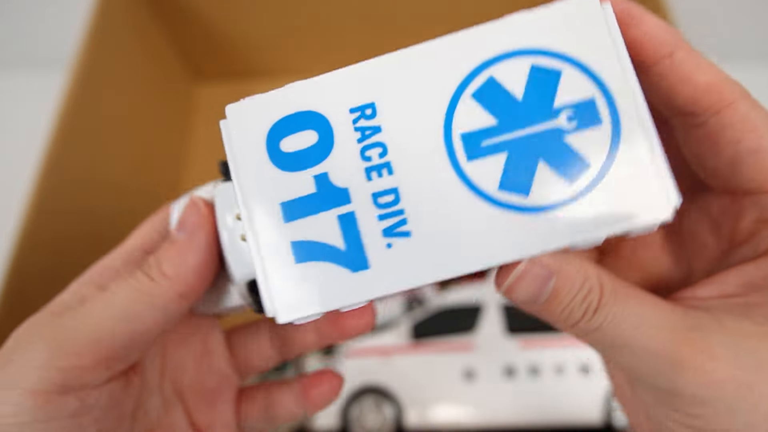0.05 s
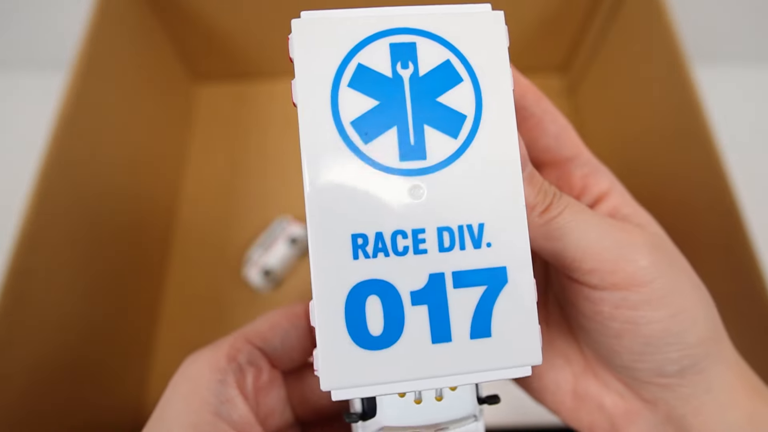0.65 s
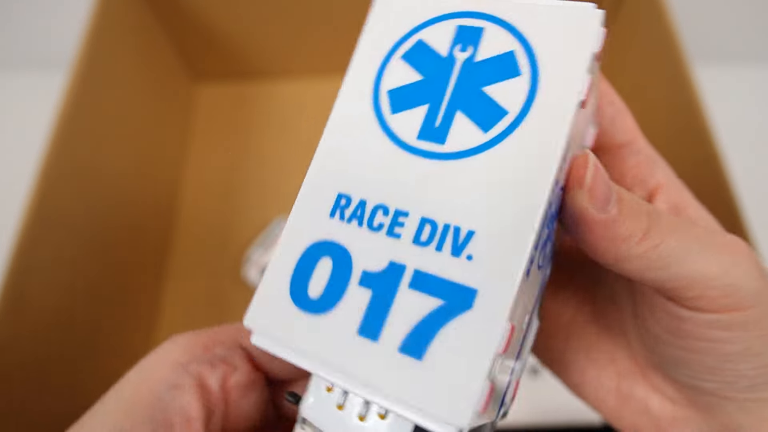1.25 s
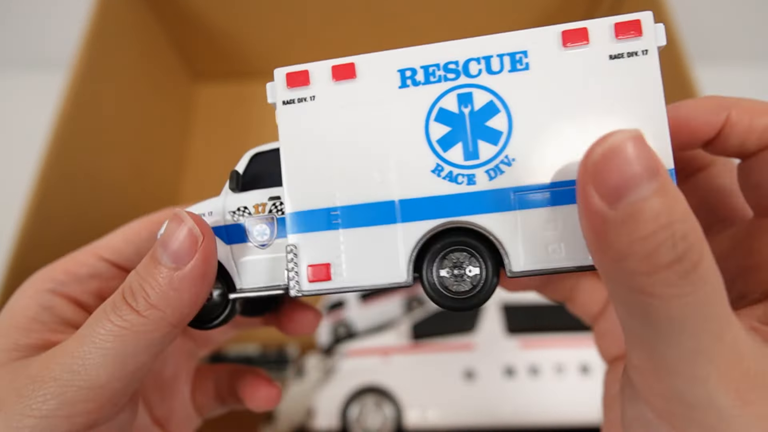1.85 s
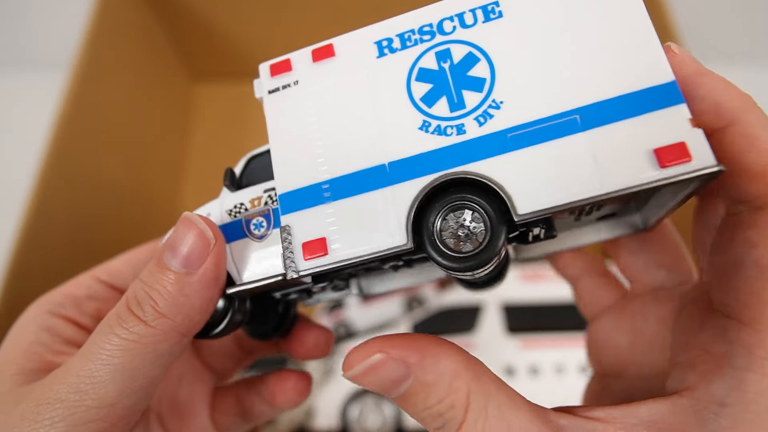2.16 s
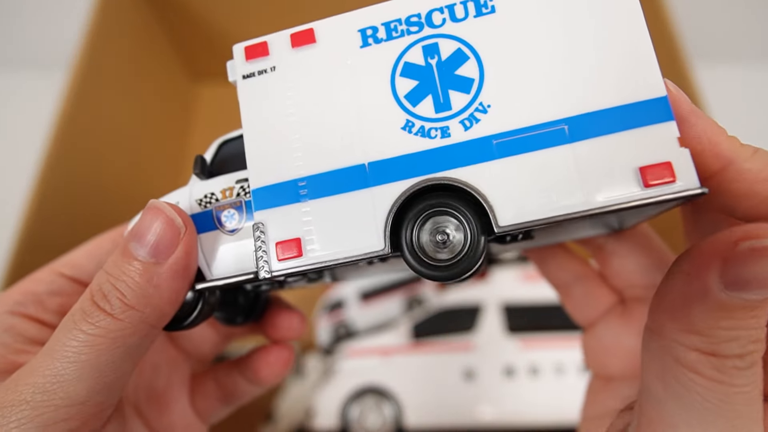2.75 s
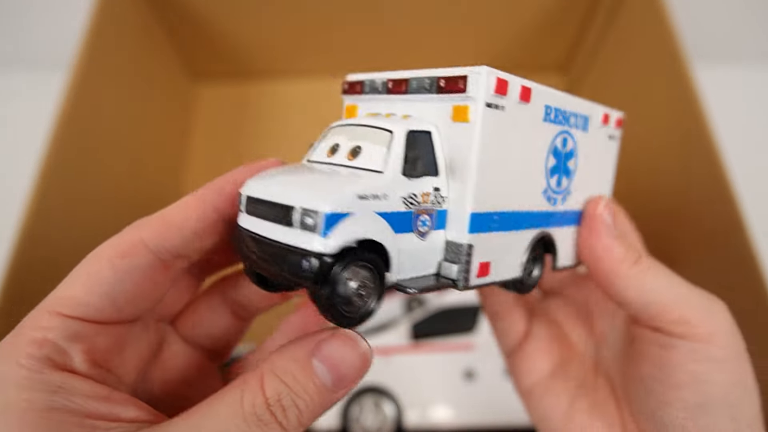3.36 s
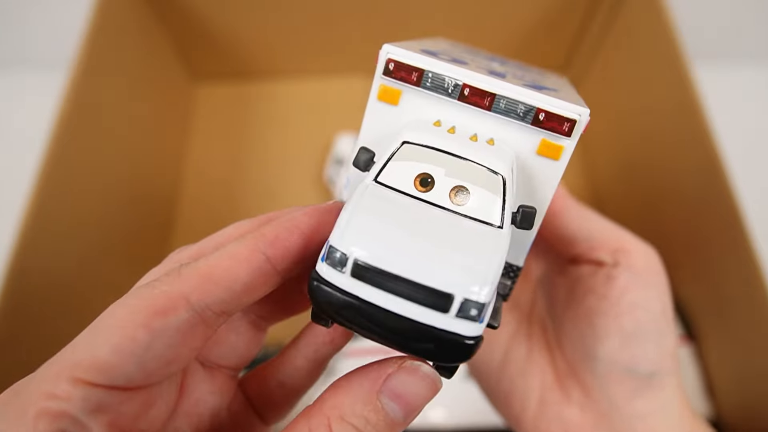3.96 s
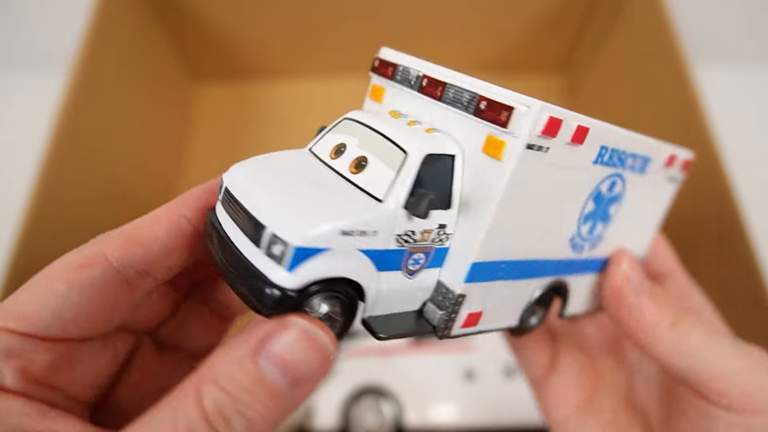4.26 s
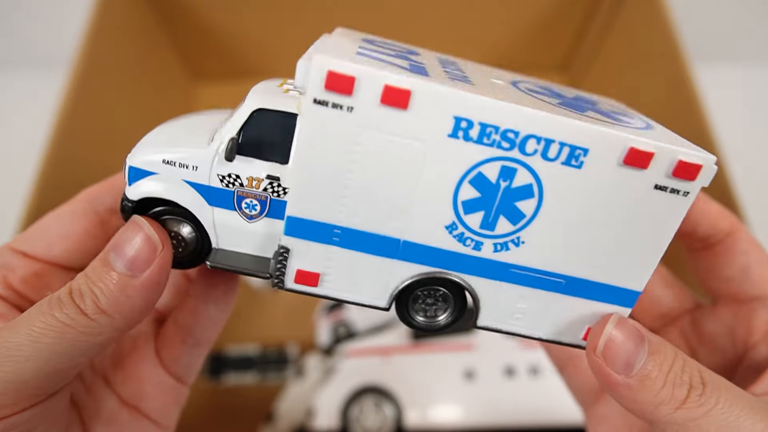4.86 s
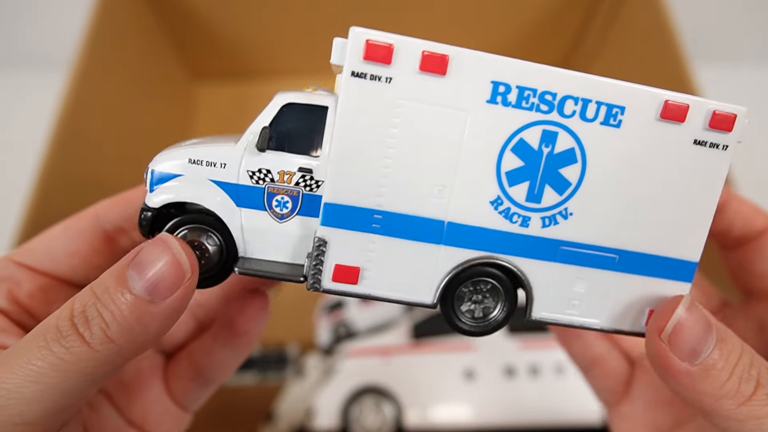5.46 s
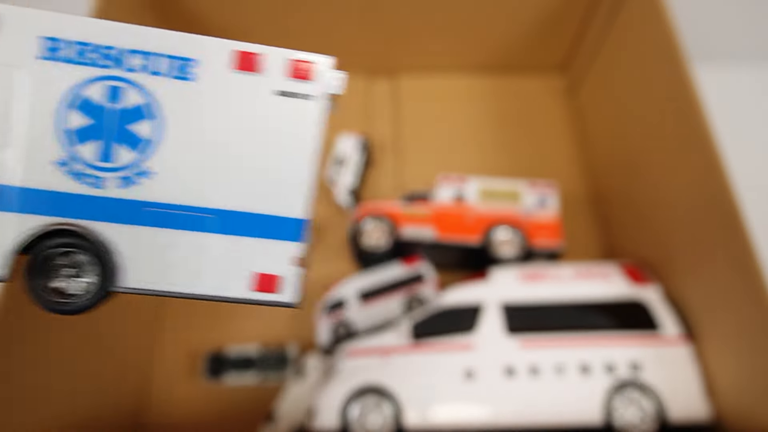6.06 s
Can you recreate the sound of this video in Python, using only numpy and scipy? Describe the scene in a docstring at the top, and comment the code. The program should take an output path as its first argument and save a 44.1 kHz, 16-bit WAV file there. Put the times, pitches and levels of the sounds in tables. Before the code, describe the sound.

Hands turn a hollow plastic toy truck close to the microphone in a small room. Fingernails and loose parts click irregularly, skin slides faintly over the shell, and soft low bumps come through a table. Midway a flicked wheel rattles on its loose axle for under a second and runs down. After a lull, more clicks come in clusters, ending with a soft swish as the hands move off.

```python
"""A plastic toy truck, turned in two hands over a cardboard box, close to the microphone in a small room.
Skin slides on the plastic, loose parts and fingernails click and ring the hollow shell, and the
table bumps softly underneath. Midway a thumb flicks a wheel, which rattles on its loose axle until
it runs down. A soft swish closes as the hands move off. Mono, with faint reflections and room tone."""
import sys
import numpy as np
from scipy import signal
from scipy.fft import rfft, irfft, next_fast_len
from scipy.io import wavfile
from scipy.ndimage import uniform_filter1d

SR = 44100
rng = np.random.default_rng(int(sys.argv[2]) if len(sys.argv) > 2 else 0)


def unload_audio(sound):
    """Save the sound as a 16-bit wav file, at the path given as the first command line argument."""
    columns = np.transpose(np.atleast_2d(sound))
    # keep every value between -1 and 1, then stretch to whole-number steps
    steps = np.round(np.clip(columns, -1, 1) * 32767)
    wavfile.write(sys.argv[1], SR, steps.astype(np.int16))


N = 273861

# fingers sliding on the plastic: start t/s, length/s, level/dB, tilt above 1 kHz/(dB per octave)
SLIDES = [(-.06, 0.21, -50, 2.5), (0.063, 0.35, -51, 3.5), (0.249, 0.4, -46.5, -1), (1.178, 0.31, -53, -2),
          (1.431, 0.089, -42, -6), (1.486, 0.14, -39, -1.5), (1.558, 0.35, -57, -1.5),
          (1.738, 0.31, -49, 3.5), (1.908, 0.25, -49, -3), (2.138, 0.15, -57.5, -1),
          (2.398, 0.11, -36.5, -4.5), (3.069, 0.044, -33, -4), (3.367, 0.33, -59, -5.5),
          (3.7, 0.17, -64, -0.5), (4.206, 0.29, -50, -4), (4.374, .17, -44, 1), (4.504, .21, -62, -4.5),
          (4.796, 0.15, -57.5, -5)]
# spectrum of skin on plastic: f/Hz, level/dB
SKIN_SPECTRUM = [(100, -43.5), (600, -26), (950, -3.5), (2100, -0.5), (3300, -3), (4300, -2), (7000, -1.5),
                 (11000, -9), (16000, -11.5)]
# modes of the hollow shell: f/Hz, level/dB, t60/s
SHELL_MODES = [(931, -6.5, 0.055), (1073, -16, 0.015), (1168, -4.5, 0.033), (1405, -7, .09),
               (1715, 3, 0.045), (1792, -3.5, 0.05), (2191, 8.5, .032), (2298, 1.5, 0.03),
               (2575, 0.5, .035), (3162, 0, 0.044), (4307, 5.5, 0.022), (4640, -10.5, 0.078),
               (5150, -14.5, 0.012), (5800, -12, .028), (5850, -10.5, 0.024), (7420, 1, .03),
               (9000, 0, .022), (10030, -15.5, 0.024), (10560, 0.5, 0.023), (11270, -2, 0.02)]
# clicks on the shell: t/s, core level/dB, struck part's f/Hz, body level/dB re core, brightness
CLICKS = [(0.03, -45, 7970, -0.5, 0.5), (0.103, -35.5, 2100, -10, -17), (0.118, -16, 2077, -9, -13),
          (0.2431, -22.5, 2204, -8.5, 0), (0.2804, -29.5, 2350, -5.5, -6), (0.2908, -21.5, 4990, -15, -5),
          (0.4027, -29, 6570, -23, -0.5), (0.456, -30.5, 7880, -17, -1.5), (0.592, -43.5, 2060, -5.5, -4.5),
          (0.7635, -36, 2134, -38, -26.5), (0.836, -49.5, 2180, -16, -20), (1.033, -57, 1933, -12, -25),
          (1.1952, -28.5, 4740, -5.5, 1), (1.257, -35, 1960, -5.5, -14), (1.287, -52, 8900, 8, 7.5),
          (1.369, -31, 2150, -9.5, -14.5), (1.4612, -31, 1990, -12, -21), (1.4654, -17, 1648, -14, -39),
          (1.509, -28.5, 1770, -5.5, -10.5), (1.564, -36, 6460, -13, 2), (1.571, -32, 2200, -22, -3.5),
          (1.694, -42, 1660, -7, -8.5), (1.758, -15.5, 2130, -14, -7), (1.764, -17.5, 1760, -8.5, -7.5),
          (1.786, -30, 10030, -3, 4.5), (1.852, -35, 4350, -0.5, -5), (1.9, -19.5, 2530, -7, -4.5),
          (1.917, -28.5, 1680, -8.5, -11), (2.039, -38, 1530, -8, -15), (2.0455, -24.5, 1420, 0, -22),
          (2.053, -31, 1415, 5, -30), (2.402, -18, 2530, -2, -5.5), (3.191, -25, 2608, -47, -8.5),
          (3.196, -41, 14500, 0, 7), (3.2139, -35.5, 2680, 0.5, 3), (3.2447, -38.5, 1400, 8, 0.5),
          (3.299, -43.5, 4160, -2, 2.5), (3.3172, -31, 3110, -7.5, 0.5), (3.3356, -28, 4290, -12.5, -5),
          (4.26, -25.5, 1795, -7, -3.5), (4.2677, -26, 11100, -11, 1), (4.3072, -21.5, 1396, -5.5, -9),
          (4.331, -40, 1184, 4, -7), (4.7945, -31, 2260, -11, -9), (5.04, -39, 2165, -19, -16),
          (5.064, -32, 2555, -13.5, -6), (5.268, -43.5, 2170, -21.5, -19), (5.5354, -48, 1725, -25, -22),
          (5.5731, -26, 5000, -10, -8.5), (5.587, -32, 4760, -5, -11), (5.6356, -18, 1406, -4, -10.5),
          (5.6467, -35.5, 1188, 7, 2), (5.693, -39.5, 1180, 1.5, -7), (5.733, -39, 1615, -9, -10.5),
          (5.76, -41.5, 1710, -4, -2.5), (5.784, -35.5, 2140, -8.5, -21)]
# the shell's body, core, edge and sparkle registers: low f/Hz, high f/Hz
REGISTERS = [(750, 1600), (1600, 3200), (3200, 7000), (7000, 16000)]
# the shell's dense wall modes: f/Hz, level/dB
CRACK_SPECTRUM = [(100, -34), (450, -25.5), (750, -32.5), (920, -0.5), (2000, 3.5), (6000, 2.5),
                  (10500, -4), (12500, -9), (16000, -12.5)]
# the fingers touch lightly before each click and the part falls back after it: t/s from the click, level/dB re
# click
TOUCH_AND_REBOUND = [(-.007, -29.5), (.006, -20)]
# soft bumps through the table: t/s, level/dB
BUMPS = [(0.82, -43.5), (0.942, -28), (1.024, -37), (1.349, -41), (1.42, -37), (1.51, -31.5), (1.599, -26),
         (1.681, -36.5), (1.91, -43), (3.143, -36), (3.637, -38), (4.51, -47), (4.636, -45), (5.221, -41),
         (6.119, -35)]
# dull rumble in each bump: f/Hz, level/dB
RUMBLE_SPECTRUM = [(15, 1.5), (28, 0), (50, 5.5), (110, 1.5), (250, -14.5), (450, -16.5), (800, -31),
                   (2000, -55)]
# modes of the wheel and chassis: f/Hz, level/dB, t60/s
CHASSIS_MODES = [(878, -21, 0.07), (935, -28.5, 0.0292), (1397, 9.5, 0.091), (1430, -18.5, 0.025),
                 (1594.6, 4, 0.1), (1623, 2, .04), (2084, 5, 0.063), (2160, -8, 0.1), (2563, -13, 0.041),
                 (2744, -9, 0.11), (2950, -18, .05), (3126, -17, 0.037), (3380, -5.5, 0.053),
                 (4365, -2.5, 0.031), (4780, -9, .03), (5390, -9, 0.015), (6500, -15, .03),
                 (10200, -15.5, 0.019), (10900, -16, .02)]
# dense, quickly dying modes of a wheel knock: f/Hz, level/dB
CLACK_SPECTRUM = [(100, -31), (300, -22), (560, -2), (740, -21.5), (900, -2), (1200, 1), (2100, 9.5),
                  (2700, 13), (3300, -11.5), (5000, -13.5), (7000, -17.5), (11000, -23), (16000, -34)]
# sharp tick of the wheel meeting its axle: f/Hz, level/dB
TICK_SPECTRUM = [(300, -37.5), (1500, 5), (2800, 5.5), (4500, 0.5), (6200, -7.5), (7500, -15.5),
                 (11000, -21), (16000, -24.5)]
# the wheel leans into its axle or runs free: t/s, half length/s, level change/dB, hardness change
LEANS = [(2.514, 0.033, 0, 7), (2.618, 0.0041, -26, -3.5), (2.715, 0.01, 3, -4), (2.798, .06, 0, -0.5),
         (2.886, .018, 8, 1.5), (2.955, .04, 3.5, -2), (3.077, 0.022, -11, -8), (3.122, .028, 5, 0)]
# swell of the swish as the hands move off: t/s, level/dB
SWISH_LEVELS = [(5.879, -72), (5.988, -58), (6.11, -56.5), (6.21, -61.5)]
# spectrum of that swish: f/Hz, level/dB
SWISH_SPECTRUM = [(500, -28.5), (1500, -11), (2300, -7), (3000, 2), (4300, 3), (5200, -15), (6500, -5),
                  (8200, -2.5), (10000, -13.5), (13000, -15), (16000, -13)]
# decay of the small room: f/Hz, t60/s
ROOM_DECAY = [(200, 0.53), (1400, 0.23), (4000, 0.18), (9000, 0.12), (16000, 0.28)]
# room tone: f/Hz, level/dB
ROOM_TONE_SPECTRUM = [(24, -28.5), (40, -12), (85, -1.5), (269, -8.5), (372, -12.5), (965, -14.5),
                      (1590, -21.5), (4340, -28.5), (5180, -27.5), (8340, -30), (9450, -28.5), (13800, -29),
                      (16000, -39.5)]

RING_T = np.arange(4096) / SR  # time axis of one blow, t/s
FLICK_S, STOP_S = 2.45, 3.32  # the wheel starts and stops


def amp(db):
    """Decibels to gain."""
    return 10 ** (np.asarray(db) / 20)


def unit_rms(x):
    """Scales to rms 1."""
    return x / np.sqrt(np.mean(x ** 2) + 1e-20)


def unit_blow(x):
    """Scales a blow to the energy of 10 ms at rms 1."""
    return x / np.sqrt(np.sum(x ** 2) / (SR / 100) + 1e-20)


def read(points, hz):
    """Reads a table on a log-frequency axis."""
    f, value = np.transpose(points)
    return np.interp(np.log(hz + 1), np.log(f + 1), value)


def add(mix, s, sound):
    """Mixes a sound in at time s."""
    at = round(s * SR)
    sound, part = sound[max(-at, 0):], mix[max(at, 0):]
    part[:len(sound)] += sound[:len(part)]


def highpass(x, hz, order):
    """Causal bass cut."""
    return signal.sosfilt(signal.butter(order, hz, "high", fs=SR, output="sos"), x)


def colour(x, points, size=1024):
    """Minimum-phase filter with the given spectrum."""
    log_gain = np.log(amp(read(points, abs(np.fft.fftfreq(size, 1 / SR)))))
    impulse = np.fft.ifft(np.exp(np.conj(signal.hilbert(log_gain)))).real
    return signal.fftconvolve(x, impulse[:size // 2])[:len(x)]


def noise(count, points, tilt_db=0):
    """Noise of rms 1 with the given spectrum, tilted per octave above 1 kHz."""
    hz = np.fft.rfftfreq(count, 1 / SR)
    gain = amp(read(points, hz) + tilt_db * np.log2(np.maximum(hz, 1000)))
    return unit_rms(irfft(rfft(rng.standard_normal(count)) * gain, count))


def decay(t60):
    """Envelope that falls 60 dB in t60 seconds."""
    return np.exp(-np.log(1000) * RING_T / t60)


def rings(modes):
    """One dying tone for each mode."""
    hz, db, t60 = np.transpose(modes)[:, :, None]
    return amp(db) * np.cos(2 * np.pi * hz * RING_T) * decay(t60)


def strike(tones, spread_db):
    """One blow: a random place of contact sets each mode's strength."""
    strengths = amp(spread_db * rng.standard_normal((len(tones), 1)))
    return unit_blow((strengths * tones).sum(0))


def burst(grain, t60):
    """Dense modes dying together: a random stretch of coloured noise under a decay."""
    at = rng.integers(len(grain) - len(RING_T))
    return unit_blow(grain[at:at + len(RING_T)] * decay(t60))


def slide_db(share, peak_share=.33, fade_db=16.5):
    """Level of a slide over its length: it swells, then fades."""
    return np.interp(share, [0, peak_share, 1], [-fade_db, 0, -fade_db])


def finger_slides(clump_db=3.0, grain_db=1.5, shell_db=-6):
    """Skin catches and slips in clumps of fine grains; each slide rings the shell from its own place."""
    out, tones = np.zeros(N), rings(SHELL_MODES)
    for start, length, db, tilt_db in SLIDES:
        t = np.arange(0, length, 1 / SR)
        clumps = unit_rms(uniform_filter1d(rng.standard_normal(len(t)), size=260))
        grains = unit_rms(uniform_filter1d(rng.standard_normal(len(t)), size=40))
        stroke = amp(db + slide_db(t / length) + clump_db * clumps + grain_db * grains)
        friction = noise(next_fast_len(len(t)), SKIN_SPECTRUM, tilt_db)[:len(t)]
        hiss = stroke * friction * signal.windows.tukey(len(t), .15)
        body = strike(tones, spread_db=3.5)
        add(out, start, hiss)
        add(out, start, amp(shell_db) * signal.fftconvolve(hiss, body / np.linalg.norm(body)))
    return out


def touches_and_rebounds(timing_spread=.25, spread_db=5.5):
    """Rows like CLICKS: the fingers' light touch before each click and a rebound after it."""
    rows = []
    for offset_s, relative_db in TOUCH_AND_REBOUND:
        for s, db, *voice in CLICKS:
            late, size = rng.standard_normal(2)
            at = s + offset_s * np.exp(timing_spread * late)
            rows.append((at, db + relative_db + spread_db * size, *voice))
    return rows


def nail_taps(per_s=14, above_slide_db=.5, spread_db=3, body_db=-4.5, brightness=-15.5):
    """Rows like CLICKS: fingernails tap faintly at random while the fingers slide."""
    rows = []
    for place, size, pick in rng.random((round(per_s * N / SR), 3)):
        s = place * N / SR
        part_hz = SHELL_MODES[int(pick * len(SHELL_MODES) / 2)][0]  # one of the lower modes
        slide_levels = [db + slide_db((s - start) / length)
                        for start, length, db, _ in SLIDES if start < s < start + length]
        if slide_levels:
            tap_db = max(slide_levels) + above_slide_db + spread_db * (2 * size - 1)
            rows.append((s, tap_db, part_hz, body_db, brightness))
    return rows


def register_levels(part_hz, body_db, brightness, lift_db=2.5):
    """A click's registers in dB re its core; a part ringing in the treble lifts its own register."""
    edge_db = 1.6 + .89 * brightness
    sparkle_db = -1.5 + 1.69 * brightness
    edge_lift, sparkle_lift = [lift_db * (low < part_hz <= high) for low, high in REGISTERS[2:]]
    return np.array([body_db, 0, edge_db + edge_lift, sparkle_db + sparkle_lift])


def voiced(blow, levels_db):
    """Colours a blow so that each register carries its level."""
    hz, power = np.fft.rfftfreq(len(blow), 1 / SR), abs(rfft(blow)) ** 2
    points = []
    for (low, high), db in zip(REGISTERS, levels_db):
        share = power[(hz > low) & (hz < high)].sum() / power.sum()
        gain_db = db - 10 * np.log10(share)
        points += [(low * 1.1, gain_db), (high / 1.1, gain_db)]
    return colour(unit_blow(blow), points)


def shell_clicks(crack_db=-1, part_db=-5, purity=.68, damped_hz=5500, rise_s=.001):
    """Each click is a crack of wall modes, the shell's ring and the struck part's own note."""
    out, tones, walls = np.zeros(N), rings(SHELL_MODES), noise(SR, CRACK_SPECTRUM)
    shell_t60 = np.array(SHELL_MODES)[:, ::2]
    for s, core_db, part_hz, body_db, brightness in [*CLICKS, *touches_and_rebounds(), *nail_taps()]:
        levels = register_levels(part_hz, body_db, brightness)
        part_t60 = .94 * read(shell_t60, part_hz) / np.hypot(1, part_hz / damped_hz)
        note = unit_blow(np.sin(2 * np.pi * part_hz * RING_T) * decay(part_t60))
        prominence_db = np.interp(part_hz, np.mean(REGISTERS, axis=1), levels) - np.mean(levels[:3])
        note_db = part_db + purity * max(prominence_db, 0)  # a light tap rings little but the part
        crack = amp(crack_db) * burst(walls, t60=.029)
        blow = crack + strike(tones, spread_db=3.5) + amp(note_db) * note
        blow *= 1 - np.exp(-RING_T / rise_s)
        radiated = highpass(blow, hz=760, order=4)  # a small shell sheds no bass
        add(out, s, voiced(radiated, core_db + levels))
    return out


def table_bumps(resonance_hz=94.1, swell_s=.014, rumble_db=-12):
    """Soft pushes swell and fade in the table's one low resonance, with a little rumble."""
    out, t = np.zeros(N), np.arange(SR // 3) / SR
    push = (t / swell_s) ** 2 * np.exp(-t / swell_s)
    tone = np.sin(2 * np.pi * resonance_hz * t)
    for s, db in BUMPS:
        rumble = amp(rumble_db) * noise(len(t), RUMBLE_SPECTRUM)
        add(out, s, amp(db) * push * (tone + rumble))
    return out


def axle_contacts(per_s=190, turns_per_s=33, rate_sag=.35, jitter=.33, spin_db=-16.5):
    """Rows of t/s, level/dB, hardness: weaker and softer as the wheel slows, one hard knock a turn."""
    gaps, size_scatter, hard_scatter = rng.standard_normal((240, 3)).T
    spin_s, at = STOP_S - FLICK_S, [FLICK_S]
    for gap in gaps[1:]:
        rate = per_s * (1 - rate_sag * min((at[-1] - FLICK_S) / spin_s, 1))
        at.append(at[-1] + np.exp(jitter * gap) / rate)
    at = np.array(at)
    spent = (at - FLICK_S) / spin_s
    slowing_db = 22.5 * np.log10(np.maximum(1 - spent, .01))
    turns = turns_per_s * (at - FLICK_S) * (1 - rate_sag * spent / 2)
    knock = np.diff(np.floor(turns), prepend=-1) > 0
    lean_s, half_s, lean_db, lean_hardness = np.transpose(LEANS)
    lean = np.exp(-((at[:, None] - lean_s) / half_s) ** 2)
    db = spin_db + slowing_db + lean @ lean_db + 2 * knock + 1.8 * size_scatter
    hardness = -5 - 4 * spent + lean @ lean_hardness + 5 * knock + 2 * hard_scatter
    return np.transpose([at, db, hardness])[at < STOP_S]


def wheel_rattle(clack_db=-5.5, tick_db=-7, treble_hz=3600, rise_s=.0006):
    """The wheel chatters on its loose axle; each contact rings the chassis with a clack and a tick."""
    out, tones = np.zeros(N), rings(CHASSIS_MODES)
    clacks, ticks = noise(SR, CLACK_SPECTRUM), noise(SR, TICK_SPECTRUM)
    # the hub touches at six places, each with its own sound
    places = [(burst(clacks, t60=.033), burst(ticks, t60=.018)) for _ in range(6)]
    for s, db, hardness in axle_contacts():
        clack, tick = places[rng.integers(len(places))]
        blow = strike(tones, spread_db=5.0) + amp(clack_db) * clack + amp(tick_db + hardness / 2) * tick
        treble = highpass(blow, treble_hz, order=1)
        blow += (amp(2.6 * hardness) - 1) * treble  # a harder hit carries more treble
        blow *= 1 - np.exp(-RING_T / rise_s)
        add(out, s, amp(db) * unit_blow(blow))
    return highpass(out, hz=470, order=2)


def swish():
    """A smooth slide as the hands move off."""
    times, db = np.transpose(SWISH_LEVELS)
    out, t = np.zeros(N), np.arange(times[0], times[-1], 1 / SR)
    add(out, times[0], amp(np.interp(t, times, db)) * noise(SR, SWISH_SPECTRUM)[:len(t)])
    return out


def reflections(x, count=20000, density=.1, gap_s=.004):
    """The small room answers with sparse reflections of random sign, the bass lasting longest."""
    taps = rng.choice([-1., 1.], count) * (rng.random(count) < density)
    taps *= np.arange(count) > gap_s * SR
    hz, t, spectra = signal.stft(taps, SR, nperseg=256)
    fade = np.exp(-np.log(1000) * t / read(ROOM_DECAY, hz)[:, None])
    tail = signal.istft(spectra * fade, SR, nperseg=256)[1]
    return signal.fftconvolve(x, tail / np.linalg.norm(tail))[:N]


def scene(reflections_db=-15.5, room_tone_db=-59):
    """One microphone close to the toy, the table below it and the room faint behind."""
    toy = shell_clicks() + wheel_rattle() + finger_slides() + swish()
    mix = toy + amp(reflections_db) * reflections(toy) + table_bumps()
    room_tone = amp(room_tone_db) * noise(next_fast_len(N), ROOM_TONE_SPECTRUM)[:N]
    return (mix + room_tone)[None]


def record(dry, ceiling=.9, cutoff_hz=16300):
    """The microphone chain rounds off the loudest peaks, then cuts the highest treble."""
    rounded = dry / (1 + (dry / ceiling) ** 8) ** (1 / 8)
    lowpass = signal.firwin(255, cutoff_hz, window=("kaiser", 9), fs=SR)
    return signal.oaconvolve(rounded, lowpass[None], "same")


dry = scene()
out = record(dry)
unload_audio(out)
```